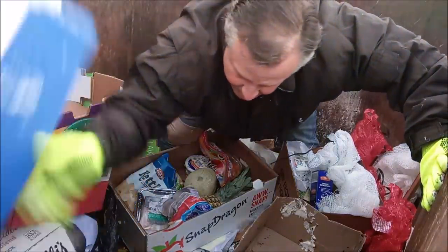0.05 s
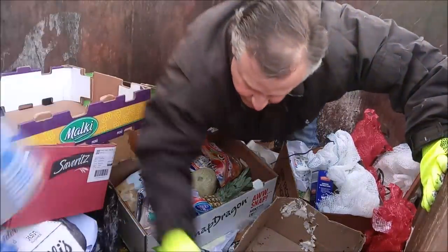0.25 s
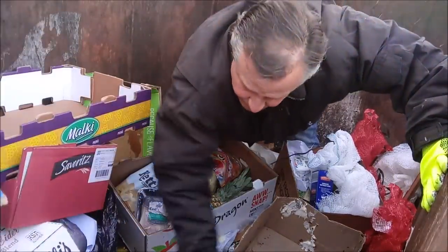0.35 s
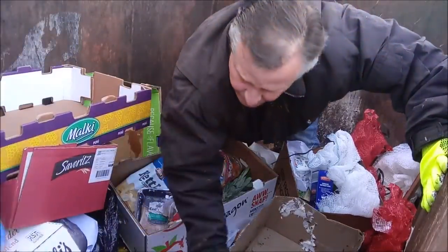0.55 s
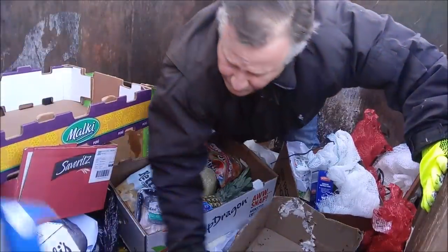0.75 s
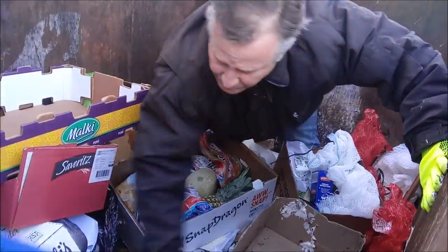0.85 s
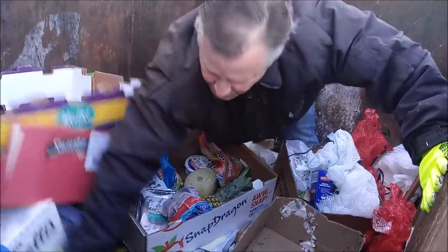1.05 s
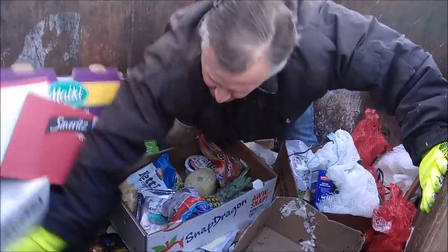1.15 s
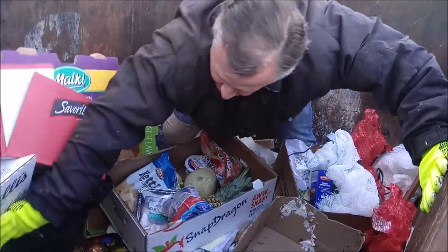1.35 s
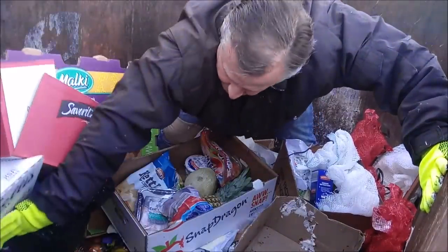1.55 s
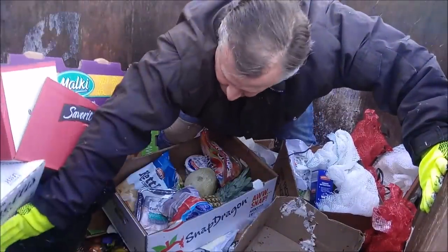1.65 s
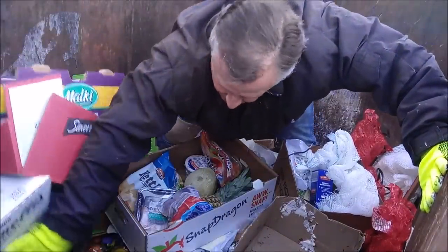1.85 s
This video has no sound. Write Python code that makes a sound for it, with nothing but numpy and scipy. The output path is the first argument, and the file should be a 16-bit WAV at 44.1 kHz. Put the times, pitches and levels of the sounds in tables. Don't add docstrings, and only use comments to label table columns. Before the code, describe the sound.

Cardboard boxes are handled close up in an open steel bin. Faint rustling leads to a box drop and flap rattle at 0.22 s, then a hard shove with dense hollow knocks at 0.37-0.46. Wrap snaps and light taps follow until 0.9; a carton scrapes with rising pitch to 1.1, crinkling swells, a firm knock lands at 1.28, then taps and rustles fade over low distant traffic.

```python
import sys
import numpy as np
from scipy import signal
from scipy.fft import rfft, irfft
from scipy.io import wavfile

SR = 44100
rng = np.random.default_rng(int(sys.argv[2]) if len(sys.argv) > 2 else 0)


def volts_from_decibels(level):
    exponent = np.asarray(level, float) / 20
    return 10 ** exponent


def pcm_store(signal):
    levels = np.round(np.clip(np.atleast_2d(signal), -1, 1) * 32767)
    wavfile.write(sys.argv[1], SR, levels.astype(np.int16).T)


N = 83790


def rms_one(x):
    return x / np.sqrt(np.mean(x ** 2) + 1e-20)


def in_time(rows, edge_db=None):
    s, *columns = np.transpose(rows)
    return [np.interp(np.arange(N) / SR, s, c, edge_db, edge_db) for c in columns]


def drift(rate_hz):
    r = np.exp(-2 * np.pi * rate_hz / SR)
    wander = signal.lfilter([1], [1, -2 * r, r * r], rng.standard_normal(N + SR))
    return rms_one(wander[SR:])


def colour(x, points, skirt_db=-30):
    hz = np.fft.rfftfreq(len(x), 1 / SR) + 1
    at, db = np.transpose(points)
    octaves_outside = np.maximum(np.log2(at[0] / hz), 0) + np.maximum(np.log2(hz / at[-1]), 0)
    gain = volts_from_decibels(np.interp(np.log(hz), np.log(at), db) + skirt_db * octaves_outside)
    return irfft(rfft(x) * rms_one(gain), len(x))


def resonance(x, hz, width_hz):
    r = np.exp(-np.pi * max(width_hz, 15) / SR)
    top = (1 - r * r) / 2
    return signal.lfilter([top, 0, -top], [1, -2 * r * np.cos(2 * np.pi * hz / SR), r * r], x)


def grains(per_s, spread_db, bed):
    sizes = volts_from_decibels(spread_db * np.minimum(rng.exponential(1, N), 5)) * rng.choice([-1, 1], N)
    clicks = sizes * (rng.random(N) < per_s / SR)
    return rms_one(rms_one(clicks) + bed * rng.standard_normal(N))


def wavelets(rows, widths_s):
    t = np.arange(N) / SR
    out = np.zeros(N)
    for (s, db, hz), width in zip(rows, widths_s):
        out += volts_from_decibels(db) * np.exp(-((t - s) / width) ** 2) * np.sin(2 * np.pi * hz * (t - s))
    return out


# start_s, rustle_level_db, card_rub_relative_db
HAND_EFFORT = [(0, -57.5, 11), (.12, -53, 6), (.2, -56, 9), (.35, -50, 13), (.47, -54, 8), (.65, -59, 10),
               (.76, -54, 5), (.8, -48, 7.5), (.89, -53, 5), (1.06, -40, 1.5), (1.2, -38.5, 2),
               (1.36, -39, 4.5), (1.42, -42.5, -0.5), (1.5, -45.5, 1.5), (1.6, -50, 4), (1.66, -54, 5),
               (1.9, -54, 2)]
# pitch_hz, level_db (per Hz)
WRAP_SPECTRUM = [(1200, -0.5), (2700, -10.5), (4450, -5.5), (6400, -7.5), (8200, -22.5), (13600, -31.5),
                 (14700, -24.5), (15800, -22)]
# pitch_hz, level_db (per Hz)
CARD_SPECTRUM = [(47, -29), (80, -7.5), (364, -2), (418, -3), (451, -2), (1140, -2), (1520, -3.5),
                 (3000, -16.5), (3900, -22.5), (6600, -120)]


def rustle():
    db, rub_db = in_time(HAND_EFFORT)
    clumps_db = 1.6 * drift(45)
    wrap = colour(grains(2500, 3.6, bed=1.4), WRAP_SPECTRUM) * volts_from_decibels(db + clumps_db)
    card_db = db + rub_db + .5 * clumps_db + 1.6 * drift(20)
    card = colour(grains(1500, 3.0, bed=1.2), CARD_SPECTRUM) * volts_from_decibels(card_db)
    return wrap + card


def crackle():
    treble = signal.butter(4, 9500, "high", fs=SR, output="sos")
    ticks = signal.sosfilt(treble, grains(300, 5.0, bed=0))
    return rms_one(ticks) * volts_from_decibels(in_time(HAND_EFFORT)[0] - 27.5 + 4 * drift(15))


# pitch_hz, level_db (per Hz)
STREET_SPECTRUM = [(30, -24), (47, 5.5), (68, -11), (125, -4.5), (170, -16.5), (350, -16.5), (900, -2),
                   (2400, -27)]


def street():
    return volts_from_decibels(-47 + 1.5 * drift(5)) * colour(rng.standard_normal(N), STREET_SPECTRUM)


# start_s, peak_level_db, t60_s, treble_db
WRAP_SNAPS = [(0.0404, -39.5, 0.06, -25), (0.1376, -55, 0.06, 5), (0.2166, -28.5, 0.062, -2),
              (0.2209, -24, 0.046, 1.5), (0.2307, -21.5, 0.11, -17), (0.316, -24, 0.039, -0.5),
              (0.3525, -31, 0.22, 4.5), (0.3704, -28, 0.27, -7), (0.51, -51, 0.06, -10),
              (0.5352, -41, 0.12, -14), (0.561, -24.5, 0.034, -15), (0.576, -39, 0.051, 12),
              (0.626, -27, 0.025, -4), (0.6734, -28.5, 0.046, -1), (0.6909, -32, 0.022, 4),
              (0.718, -35, 0.033, -2), (0.7284, -62, 0.056, 0), (0.7754, -28.5, 0.08, -1),
              (0.802, -28.5, 0.072, -13), (0.829, -32.5, 0.18, -7), (0.8665, -39.5, 0.22, 3),
              (1.0584, -42, 0.14, 21), (1.099, -37, 0.026, 6), (1.2309, -18.5, 0.11, -10),
              (1.278, -20.5, 0.034, 2), (1.3525, -29, 0.033, -3), (1.5554, -29, 0.048, -1),
              (1.578, -39, 0.055, -6), (1.5963, -28.5, 0.022, 0), (1.691, -38, 0.074, -3),
              (1.0375, -45, .03, 12), (1.084, -41, .04, 15), (1.132, -38, .03, 12), (1.152, -31, .03, 2),
              (1.4027, -46, .03, 0), (1.49, -44, .03, 1), (1.7085, -56, .03, 18), (1.717, -46.5, .03, 18),
              (1.7564, -52, .03, 18), (.95, -47, .05, 5), (0.991, -32, 0.044, -1)]


def snaps():
    tail_db, pop_db, rise_s = -9, -5, 0.00088
    t, noise = np.arange(N) / SR, grains(6900, 3.9, bed=0.99)
    body, treble = np.zeros(N), np.zeros(N)
    for s, db, t60, treble_db in WRAP_SNAPS:
        age = np.maximum(t - s, 0)
        burst = noise * volts_from_decibels(db + tail_db - 60 * age / max(t60, .005)) * np.minimum(age / rise_s, 1)
        burst[int(s * SR) + 30] += volts_from_decibels(db + pop_db)
        body += burst
        treble += burst * volts_from_decibels(treble_db)
    split = signal.butter(3, 7800, fs=SR, output="sos")
    return colour(signal.sosfiltfilt(split, body - treble) + treble, WRAP_SPECTRUM, skirt_db=-11)


def steel_bin(x):
    t60_s, first_bounce_s = .07, .003
    t = np.arange(SR // 4) / SR
    tail = rng.standard_normal(len(t)) * volts_from_decibels(-60 * t / t60_s) * (t > first_bounce_s)
    tail = signal.lfilter([.4], [1, -.6], tail)
    return signal.fftconvolve(x, tail / np.sqrt(np.sum(tail ** 2)))[:N]


# centre_s, peak_level_db, pitch_hz
WEIGHT_THUDS = [
    (1.125, -44, 95),
    (.225, -45, 136),
    (0.322, -37, 291),
    (.384, -37, 265),
    (1.325, -36, 355),
    (1.285, -43, 85),
    (1.25, -44, 200),
    (1.3, -45, 196),
    (1.375, -45, 180),
    (.1, -49, 125),
]


def thuds():
    return wavelets(WEIGHT_THUDS, [3.1 / hz for s, db, hz in WEIGHT_THUDS])


# start_s, level_db
BOX_SHOVE = [
    (.205, -66),
    (.225, -28),
    (.26, -42),
    (.295, -39),
    (.318, -37.5),
    (.362, -34),
    (.39, -28),
    (.41, -25),
    (.455, -29),
    (.485, -57),
]
# pitch_hz, width_hz, level_db
BOX_MODES = [(431, 180, 2.5), (650, 28, 5), (1070, 130, 5), (1540, 37, -15), (1710, 73, -8), (2000, 260, 2)]


def shove():
    soft = [1, -1.5, .6]
    bumps = signal.lfilter([1], soft, grains(1200, 3.0, bed=.6)) * volts_from_decibels(2.2 * drift(40))
    bumps = signal.lfilter([1], soft, bumps)
    body = np.zeros(N)
    for k, (hz, width, level_db) in enumerate(BOX_MODES):
        body += volts_from_decibels(level_db) * (-1) ** k * rms_one(resonance(bumps, hz, width + 60))
    db = in_time(BOX_SHOVE, edge_db=-99)[0] - 7.0
    rub = volts_from_decibels(-3) * colour(grains(1800, 2.3, bed=3.2), CARD_SPECTRUM)
    crunch_db = -27.5 + 1.5 * (db + 25.5) + 0.5 * drift(27)
    crunch = volts_from_decibels(crunch_db) * colour(grains(3900, 1.5, bed=0.82), WRAP_SPECTRUM) * (db > -90)
    return (rms_one(body) + rub) * volts_from_decibels(db) + crunch


# start_s, peak_level_db, first_pitch_hz, second_pitch_hz, second_relative_db
CARD_KNOCKS = [(.214, -31, 1705, 1090, -12), (.2195, -35, 1790, 960, -9), (.2235, -27.5, 1300, 1004, -5),
               (0.2322, -19, 1830, 2574, -14.5), (.234, -31, 966, 4350, 1), (.306, -33, 400, 830, -2),
               (.3115, -29, 1644, 415, -2), (.317, -27, 448, 820, -4), (.324, -35, 473, 880, 1),
               (.3705, -18.5, 1125, 757, -4.5), (.379, -28, 350, 1060, 3.5), (.397, -16, 1070, 2030, -11),
               (.4015, -15, 451, 737, -14), (.408, -14, 1102, 1812, -8.5), (.417, -21, 1006, 635, -0.5),
               (0.427, -13, 1134, 2114, -8), (.4335, -27.5, 1130, 1457, -2), (.4395, -21, 1155, 474, -4.5),
               (.447, -32, 460, 2200, -6), (.453, -26.5, 796, 1090, -4), (.46, -30.5, 823, 348, -0.5),
               (.777, -37.5, 980, 523, -0.5), (0.8235, -30.5, 392, 1195, -2), (.84, -30.5, 391, 2260, -7),
               (.856, -38.5, 376, 1160, 2), (1.045, -35.5, 670, 570, -5), (1.1, -32.5, 560, 340, -1),
               (1.126, -31, 416, 726, -1.5), (.889, -34, 1035, 1750, -6), (1.082, -37, 1750, 1020, -3),
               (1.232, -30, 960, 2720, -9), (1.231, -29.5, 1570, 4460, -2.5),
               (1.285, -15.5, 562, 1170, -7.5), (1.292, -23, 574, 1227, 0), (1.304, -37, 714, 1240, -4),
               (1.316, -30, 1364, 770, -2), (1.325, -25, 1300, 1022, -7)]


def knocks():
    contact_s, ring_cycles, ring_t60_s = .0022, 7.0, .012
    scuff_db, scuff_t60_s = -12.5, .06
    out, scuff, t = np.zeros(N + SR), np.zeros(N + SR), np.arange(SR // 8) / SR
    swell = (1 - np.exp(-t / contact_s)) ** 3
    for s, db, first_hz, second_hz, second_db in CARD_KNOCKS:
        span = slice(int(s * SR), int(s * SR) + len(t))
        scuff[span] += volts_from_decibels(db + scuff_db - 60 * t / scuff_t60_s) * swell
        for hz, level_db in ((first_hz, db), (second_hz, db + second_db)):
            shape = swell * volts_from_decibels(-60 * t / (ring_t60_s + ring_cycles / hz))
            tone = np.sin(2 * np.pi * hz * t + rng.uniform(0, 2 * np.pi))
            out[span] += volts_from_decibels(level_db) * shape / shape.max() * tone
    rough_card = colour(grains(1300, 2.7, bed=0.84), CARD_SPECTRUM[3:], -5.5)
    return out[:N] + scuff[:N] * rough_card


# start_s, level_db
FLAP_RATTLE = [
    (.214, -57),
    (.222, -33.5),
    (.252, -32.5),
    (.27, -38),
    (.3, -39),
    (.33, -45),
    (.345, -58),
]
# pitch_hz, width_hz, level_db
FLAP_PANEL = [(880, 120, -4), (1300, 340, -11), (1750, 280, 2), (2100, 440, -3)]


def flap():
    slaps, body = grains(1500, 3.0, bed=.8), np.zeros(N)
    for k, (hz, width, db) in enumerate(FLAP_PANEL):
        mode = resonance(resonance(slaps, hz, width), hz, 2 * width)
        body += volts_from_decibels(db) * (-1) ** k * rms_one(mode)
    return rms_one(body) * volts_from_decibels(in_time(FLAP_RATTLE, edge_db=-99)[0])


# start_s, peak_level_db, pitch_hz
FINGER_TAPS = [
    (.7175, -30, 1300),
    (.7805, -30, 800),
    (.8262, -26, 700),
    (.8445, -25, 1100),
    (.8605, -27, 1100),
    (1.0195, -25, 1300),
    (1.083, -27, 1500),
    (1.479, -27, 1300),
    (1.5765, -24, 1100),
    (1.692, -32, 1300),
]


def taps():
    out, width_hz = np.zeros(N), 700
    for s, db, hz in FINGER_TAPS:
        click = np.zeros(N)
        click[[int(s * SR), int((s + .004) * SR), int((s + .007) * SR)]] = 1, -.55, .35
        ring = resonance(resonance(click, hz, width_hz), hz, 1.3 * width_hz)
        out += volts_from_decibels(db) * ring / np.abs(ring).max()
    return out


# start_s, level_db, cavity_pitch_hz
CARTON_SLIDE = [
    (.86, -44.5, 920),
    (.93, -43.5, 950),
    (.97, -38.5, 891.5),
    (1.02, -39.5, 950.6),
    (1.085, -36, 1027),
    (1.115, -46, 1083),
]


def slide():
    db, hz = in_time(CARTON_SLIDE)
    phase, out, width_hz = 2 * np.pi * np.cumsum(hz) / SR, np.zeros(N), 140
    for ratio, level_db in ((1, 0), (1.62, -1)):
        in_phase = drift(width_hz) * np.cos(ratio * phase)
        out += volts_from_decibels(level_db) * (in_phase + drift(width_hz) * np.sin(ratio * phase))
    return out * volts_from_decibels(db - 1.5 - 99 * (db == db[0]) - 99 * (db == db[-1]))


def scene():
    blows = knocks() + taps() + snaps()
    handling = rustle() + crackle() + thuds() + shove() + flap() + slide()
    return (blows + volts_from_decibels(-13) * steel_bin(blows) + handling + street())[None]


# centre_s, half_width_s, treble_db, bass_db
LEVEL_DIPS = [
    (.285, .016, -7, 0),
    (1.329, .0055, -18, -3),
    (1.394, .0065, -19, -16),
]
# centre_s, peak_level_db, pitch_hz
THIN_TONES = [(1.326, -44, 5240), (1.325, -45, 5050), (1.326, -48, 6600), (1.328, -43, 1950),
              (1.399, -43, 3770), (1.395, -43, 2300), (1.396, -44, 1880), (1.394, -42, 990),
              (1.394, -43, 366), (1.395, -52, 6200), (1.395, -52, 6740), (.787, -46, 3450),
              (.786, -43.5, 4350), (.784, -45, 6000), (.81, -46, 3430), (1.327, -38, 750),
              (1.33, -38, 1010)]


def top_cut(x):
    return signal.sosfilt(signal.butter(12, 15850, fs=SR, output="sos"), x)


def record(dry):
    t = np.arange(N) / SR
    treble_db, bass_db = np.zeros(N), np.zeros(N)
    for s, width, treble_dip, bass_dip in LEVEL_DIPS:
        dip = np.exp(-((t - s) / width) ** 2)
        treble_db += treble_dip * dip
        bass_db += bass_dip * dip
    bass = signal.sosfiltfilt(signal.butter(4, 1900, fs=SR, output="sos"), dry)
    x = bass * volts_from_decibels(bass_db) + (dry - bass) * volts_from_decibels(treble_db)
    x = x + wavelets(THIN_TONES, [.011] * len(THIN_TONES))
    x = signal.sosfilt(signal.butter(3, 38, "high", fs=SR, output="sos"), x)
    x = irfft(rfft(x) * (np.fft.rfftfreq(N, 1 / SR) < 15850), N)
    return top_cut(x)


dry = scene()
out = record(dry)
pcm_store(out)
```